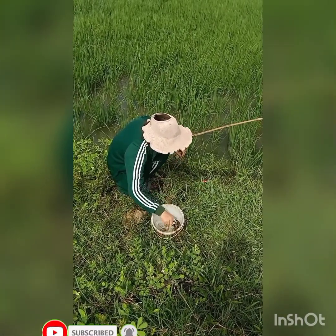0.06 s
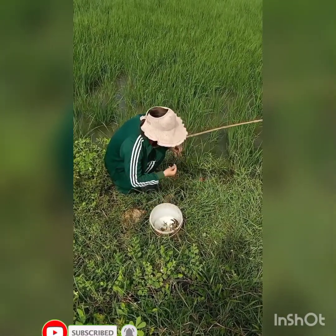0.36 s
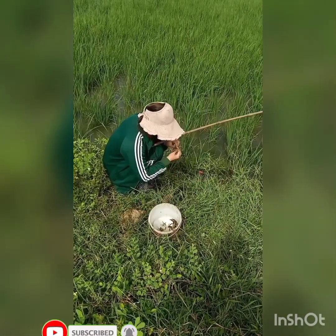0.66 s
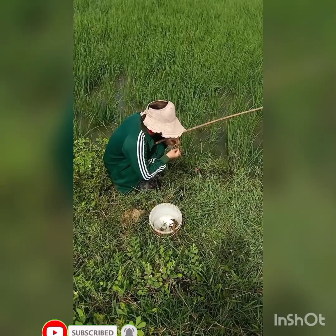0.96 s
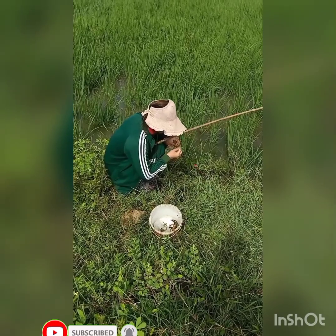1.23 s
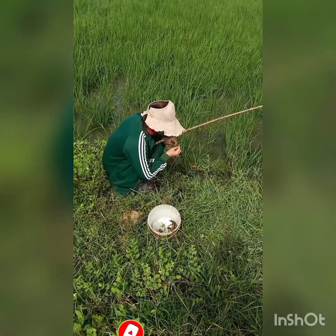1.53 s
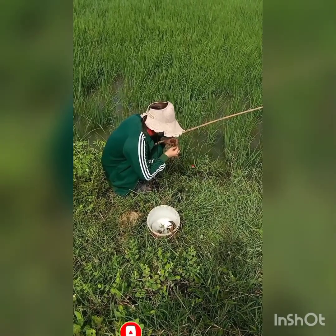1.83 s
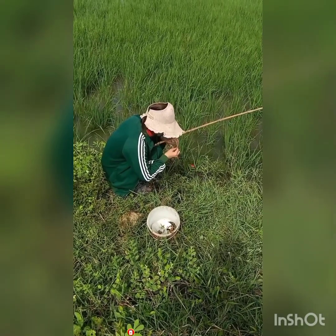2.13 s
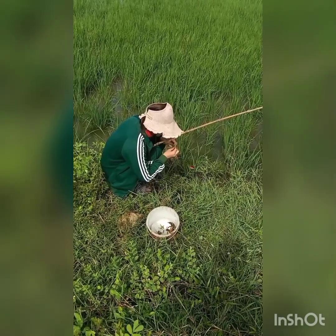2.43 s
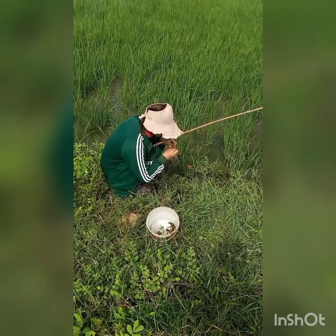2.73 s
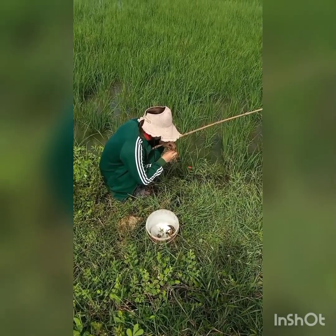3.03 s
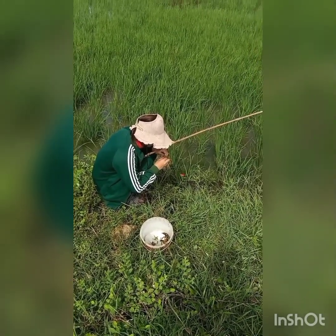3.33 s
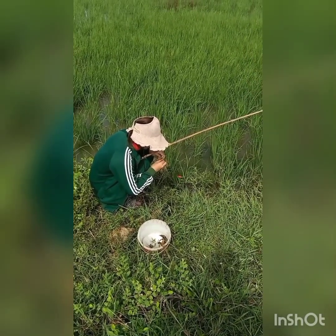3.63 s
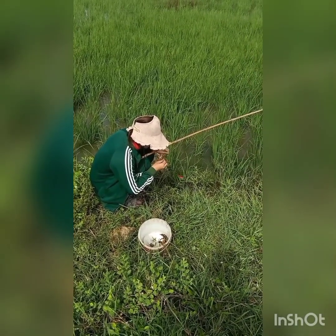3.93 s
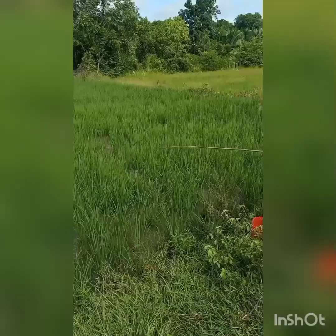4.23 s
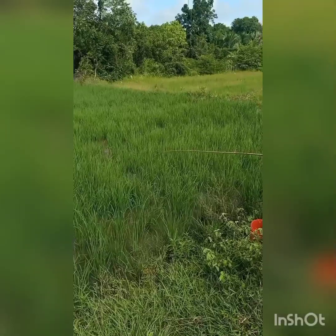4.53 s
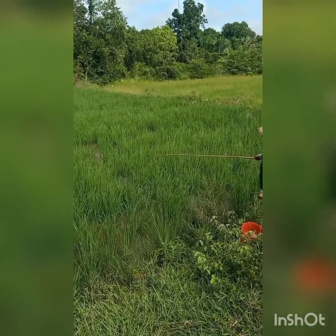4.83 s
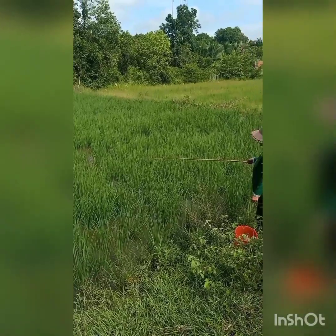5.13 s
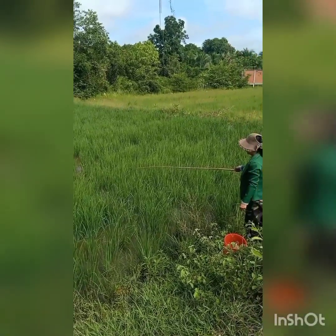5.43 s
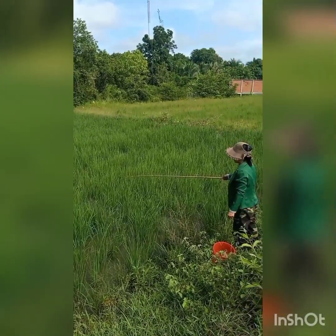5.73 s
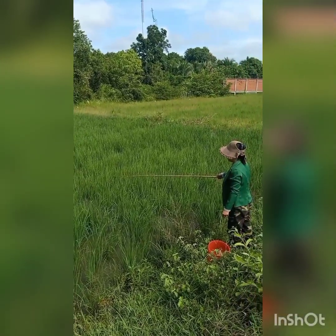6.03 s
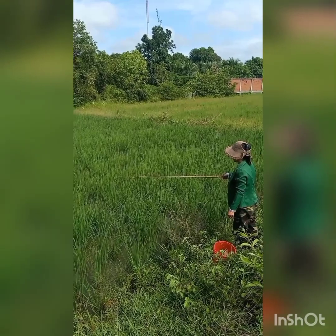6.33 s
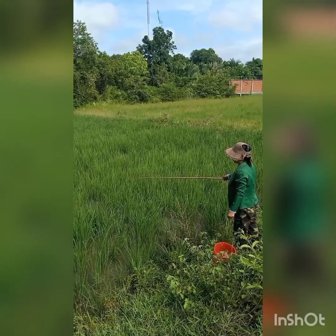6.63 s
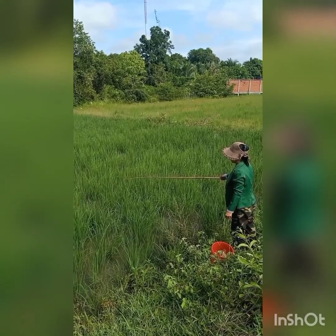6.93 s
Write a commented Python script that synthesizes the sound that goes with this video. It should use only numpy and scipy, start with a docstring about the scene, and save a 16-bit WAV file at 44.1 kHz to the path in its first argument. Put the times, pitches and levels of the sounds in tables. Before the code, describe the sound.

Hollow hoots, clucks and quick trills from a close bird outdoors, with a sudden knocking swish, distant thin whistles and faint insects.

```python
"""A marsh bird calls over a rice field: clucks, quickening trills and hollow, arched hoots that break
to a lower register. Its swollen throat favours the fundamental, so the tone is nearly pure, with hoarse
air around it. A loud swish of noise swells into close knocks and a thump, then dies away. Small birds
whistle high and far off, over a quiet bed of air, low hum, insects, snapping stalks, soft rustles
and a faint far tone fading at the start."""
import sys
import numpy as np
from scipy import signal
from scipy.fft import rfft, irfft, next_fast_len
from scipy.io import wavfile
from scipy.ndimage import map_coordinates

SR = 44100
rng = np.random.default_rng(int(sys.argv[2]) if len(sys.argv) > 2 else 0)


def int16_out(signal):
    """Quantize to a 16-bit WAV file."""
    q = np.round(np.clip(np.atleast_2d(signal).T, -1, 1) * 32767)
    wavfile.write(sys.argv[1], SR, q.astype(np.int16))


N = 315756
T = np.arange(N) / SR


def amp(db):
    """Decibels to gain."""
    return 10 ** (np.asarray(db) / 20)


def unit(x):
    """Scale to rms 1."""
    return x / np.sqrt(np.mean(x ** 2) + 1e-20)


def along(points, hz):
    """Read a curve of (Hz, value) points on a log frequency axis."""
    freqs, values = np.transpose(points)
    return np.interp(np.log(hz + 1), np.log(freqs), values)


def wobble(rate):
    """Smooth random modulation, rate knots a second."""
    return map_coordinates(rng.standard_normal(int(N * rate / SR) + 4), [T * rate])


def filtered(x, gain):
    """EQ x with a gain that depends on frequency."""
    size = next_fast_len(N + SR // 2)
    return irfft(rfft(x, size) * gain(np.fft.rfftfreq(size, 1 / SR)), size)[:N]


def noise(spectrum):
    """Noise of rms 1 with the given (Hz, dB) colour."""
    return unit(filtered(rng.standard_normal(N), lambda hz: amp(along(spectrum, hz))))


def band(centre_hz, octaves):
    """Noise of rms 1 in one bell-shaped band."""
    bell = lambda hz: np.exp(-.5 * (np.log2((hz + 1) / centre_hz) / octaves) ** 2)
    return unit(filtered(rng.standard_normal(N), bell))


def sine(pitch):
    """A sine oscillator following a pitch curve in Hz."""
    return np.sin(2 * np.pi * np.cumsum(pitch) / SR)


def ramp(length):
    """From 0 to 1 in length seconds."""
    return np.linspace(0, 1, int(length * SR))


def decay(t, t60):
    """An envelope that loses 60 dB every t60 seconds."""
    return np.exp(-np.log(1000) * t / t60)


def gate(t, length, attack, release):
    """Opens smoothly at t = 0 and has closed by t = length."""
    return np.sin(np.pi / 2 * np.clip(np.minimum(t / attack, (length - t) / release), 0, 1)) ** 2


def surge(s, rise, hold, t60, bend=2):
    """Swells up to time s, holds and dies away; a lower bend makes the swell more pointed."""
    return np.exp(-(np.maximum(s - T, 0) / rise) ** bend) * decay(np.maximum(T - s - hold, 0), t60)


def add(track, s, sound):
    """Mix a sound into the track at time s."""
    part = track[max(round(s * SR), 0):][:len(sound)]
    part += sound[:len(part)]


# Colour of the still air: (frequency [Hz], relative level [dB])
AIR_COLOUR = [(25, -26.5), (42, -12.5), (60, 1), (110, 7), (150, -3.5), (260, -7.5), (450, -11), (900, -11),
              (1500, -20.5), (2400, -14.5), (3300, -28), (6800, -31), (8500, -38), (15000, -39.5)]
# Hum tones: (pitch [Hz], level [dB])
HUM_TONES = [(66.5, -77.5), (98, -76.5)]
# Far insect chorus: (centre [Hz], width [octaves], level [dB])
INSECT_BANDS = [(2178, .06, -82), (5000, .05, -94), (6437, .06, -95.5)]
def ambient_bed(air_db=-72.5, drift_rad=.14, throb_hz=10.4, throb_db=3.5, shimmer_db=1):
    """Still air, two low hum tones that throb in turn, and a shimmer of far insects."""
    throb = throb_db * np.sin(2 * np.pi * throb_hz * T)
    hum = np.zeros(N)
    for k, (hz, db) in enumerate(HUM_TONES):
        tone = np.sqrt(2) * np.sin(2 * np.pi * hz * T + drift_rad * wobble(32))
        hum += amp(db + (-1) ** k * throb) * tone
    insects = sum(amp(db + shimmer_db * wobble(25)) * band(hz, octaves)
                  for hz, octaves, db in INSECT_BANDS)
    return hum + insects + amp(air_db) * noise(AIR_COLOUR)


def cricket(tick_hz=5100, period_s=.192, spacing_s=.036, tick_s=.0044, level_db=-81):
    """A far insect ticks in threes, each tick falling a little in pitch."""
    out = np.zeros(N)
    progress = ramp(tick_s)
    for group in np.arange(.09, N / SR, period_s):
        for k, (accent, detune) in enumerate(rng.standard_normal((3, 2))):
            pitch = tick_hz * (1 + .015 * detune - .06 * (progress - .5))
            envelope = amp(level_db + 2 * accent) * np.sin(np.pi * progress)
            add(out, group + k * spacing_s, envelope * sine(pitch))
    return out


# A faint far tone (first row), then soft rustles:
# (peak time [s], rise [s], t60 [s], centre [Hz], width [octaves], level [dB])
TONE_AND_RUSTLE_CUES = [(0, .02, 0.69, 1056, 0.04, -70), (.219, 0.17, 2.5, 497, 0.2, -74),
                        (.2, .35, 3.1, 2300, .25, -82), (3.75, 0.089, 3.45, 257, 0.11, -76.5),
                        (5.09, .046, 0.83, 588.4, .22, -73.5), (5.38, 0.034, 0.69, 327.3, 0.49, -69),
                        (5.61, .021, 0.7, 600, .7, -69.5), (5.61, 0.015, 0.46, 5390, 0.12, -75),
                        (5.892, 0.0098, 0.58, 213.3, 0.8, -57.5), (6.08, 0.19, 3.6, 2104, 0.36, -71),
                        (6.302, 0.38, 2.8, 311, 0.16, -69.5)]
def far_tone_and_rustles():
    """A faint far tone, a very narrow noise band, fades at the start; wider bands swell as soft rustles."""
    return sum(amp(db) * surge(s, rise, 0, t60) * band(hz, octaves)
               for s, rise, t60, hz, octaves, db in TONE_AND_RUSTLE_CUES)


# Stalk snaps: (time [s], level [dB])
SNAP_CUES = [(4.3949, -62), (4.544, -72), (4.5742, -68), (4.657, -68.5), (5.605, -66), (5.8851, -65)]
def stalk_snaps(t60=.014):
    """Dry stalks snap in tiny bursts of bright noise."""
    envelope = np.zeros(N)
    t = np.arange(SR // 20) / SR
    for s, db in SNAP_CUES:
        add(envelope, s, amp(db) * decay(t, t60))
    return envelope * band(2200, .8)


# Reverb decay of the field: (frequency [Hz], t60 [s])
FIELD_DECAY = [(300, 0.62), (750, .4), (2000, .22), (6000, .24), (10000, 0.05)]
def field_reverb(x, build_s=.022):
    """The field and its tree line scatter sound back as a diffuse tail, longest in the lows."""
    hz, t, spectra = signal.stft(rng.standard_normal(SR // 2), SR, nperseg=256)
    tail = signal.istft(spectra * decay(t, along(FIELD_DECAY, hz)[:, None]), SR, nperseg=256)[1]
    tail *= 1 - np.exp(-np.arange(len(tail)) / SR / build_s)
    return signal.fftconvolve(x, tail / np.linalg.norm(tail))[:N]


# Arched chirps: (time [s], level [dB])
CHIRP_CUES = [(.925, -68), (4.676, -69)]
# Sputters: (time [s], sweeps [count, rounded in use], spacing [s], top pitch [Hz], mid level [dB],
# afternote level [dB], top edge level [dB])
SPUTTER_CUES = [(1.952, 1.7, 0.009, 7670, -55, -77, -80.5), (3.1, 3.5, 0.011, 6930, -51.5, -61.5, -80),
                (5.002, 3.6, .0095, 6660, -53.5, -65, -100)]
# Flat peeps: (time [s], length [s], pitch [Hz], level [dB])
PEEP_CUES = [(1.323, 0.017, 5375, -56.5), (1.43, .038, 5620, -68.5), (1.801, 0.036, 5330, -66.5),
             (3.056, .045, 5540, -64.5), (5.113, 0.015, 6440, -63), (6.582, .027, 5370, -63),
             (6.796, 0.017, 5580, -69), (6.902, 0.026, 5230, -70.5)]
def small_birds(sweep_from_hz=4980, scatter_hz=180, grow_db=4.5, sizzle_db=-4.5):
    """Thin whistles: arched chirps, sizzling sputters of rising sweeps, and flat peeps."""
    out, drift = np.zeros(N), wobble(500)
    sizzle, top_edge = band(5630, .11), band(8800, .07)

    def whistle(s, pitch, db, waver=.022):
        """One softly rounded note wavering along a pitch curve."""
        pitch = pitch * (1 + waver * drift[round(s * SR):][:len(pitch)])
        envelope = np.sin(np.linspace(0, np.pi, len(pitch)))
        add(out, s, np.sqrt(2) * amp(db) * envelope * sine(pitch))

    for s, db in CHIRP_CUES:
        from_crest = (ramp(.05) - .33) / .67
        whistle(s, 7250 - 1600 * from_crest ** 2, db)
    for s, sweeps, spacing, top_hz, db, after_db, edge_db in SPUTTER_CUES:
        sweep = sweep_from_hz + (top_hz - sweep_from_hz) * ramp(.014)
        for k in range(round(sweeps)):
            pitch = sweep + scatter_hz * rng.standard_normal()
            whistle(s + k * spacing, pitch, db + grow_db * (k - sweeps / 2))
        whistle(s + .069, 6400 - 1150 * ramp(.032), after_db)  # falling afternote
        burst = surge(s + (sweeps - 1) * spacing, rise=.016, hold=0, t60=.08)  # near the last sweep
        out += burst * (amp(db + sizzle_db) * sizzle + amp(edge_db) * top_edge)
    for s, length, hz, db in PEEP_CUES:
        whistle(s, np.full(int(length * SR), hz), db, waver=.006)
    return out


# Hollow body of the swish: (frequency [Hz], relative level [dB])
BODY_COLOUR = [(25, -17), (90, -27), (180, -27.5), (245, -12), (320, -1.5), (420, -7), (530, 1),
               (650, -5.5), (820, -14), (1000, -29), (2000, -80.5)]
# Hiss on top of it: (frequency [Hz], relative level [dB])
HISS_COLOUR = [(450, -30.5), (660, 8.5), (810, 11), (930, -1), (1300, -1), (2000, -8.5), (3000, -12.5),
               (5500, -16), (7000, -20.5), (8800, -24.5), (9600, -50.5), (15000, -66.5)]
def swish(start_s=1.4897, peak_s=1.56, end_s=1.876, swell_db=29, release_s=.018):
    """A hollow rush layered with hiss and rumble swells quickly, fades slowly and stops."""
    before_peak = np.clip((peak_s - T) / (peak_s - start_s), 0, 1) ** 1.6
    fade = np.clip((T - peak_s) / (end_s - peak_s), 0, 1) ** .65  # steep at first, then slower
    window = gate(T - start_s, end_s + release_s - start_s, attack=.0017, release=release_s)
    body = amp(-12.5 - 36.5 * fade) * noise(BODY_COLOUR)
    hiss = amp(-21.5 - 42.5 * fade) * noise(HISS_COLOUR)
    rumble = amp(-42 - 18 * fade) * band(24, .59)
    return window * amp(-swell_db * before_peak) * (body + hiss + rumble)


# Knocks at the crest of the swish: (time [s], pitch [Hz], gain [dB], t60 [s])
KNOCK_CUES = [(1.5438, 640, -2.5, .04), (1.5543, 530, 0, .035), (1.5604, 560, -4, .014)]
def knocks(thump_s=1.5615, thump_width_s=.0052, thump_gain_db=-8, attack_s=.00064):
    """Dull, quickly damped blows ride on a thump: one low push and pull of air."""
    offset = (T - thump_s) / thump_width_s
    out = -amp(thump_gain_db) * offset * np.exp(-.5 * offset ** 2)
    t = np.arange(SR // 8) / SR
    for s, hz, db, t60 in KNOCK_CUES:
        envelope = decay(t, t60) * (1 - np.exp(-t / attack_s))
        add(out, s, amp(db) * envelope * np.sin(2 * np.pi * hz * t))
    return out


# Resonance of the marsh bird's throat: (frequency [Hz], relative level [dB])
THROAT_COLOUR = [(250, -50), (450, -23.5), (590, 3), (780, 2.5), (900, -5), (1050, -12.5), (1450, -28),
                 (2000, -41.5), (4000, -53), (5400, -48), (7000, -58.5), (9000, -69.5)]
# Hoarse air around the notes: (peak time [s], rise [s], hold [s], t60 [s], level before trim [dB])
RASP_CUES = [(0.851, .007, 0.0039, 0.25, -38.5), (1.172, 0.024, 0.027, 0.06, -38.5),
             (2.329, .005, 0.0049, .07, -39), (6.12, .009, 0.0039, .3, -40),
             (6.441, 0.027, 0.0079, 0.049, -36), (6.817, 0.023, 0.29, 0.49, -44.5)]
def rasp(rough_db=3, trim_db=-1):
    """An irregular flutter of air rings in the marsh bird's throat."""
    envelope = sum(amp(db) * surge(s, rise, hold, t60, bend=1.1) for s, rise, hold, t60, db in RASP_CUES)
    breath = unit(noise(THROAT_COLOUR) * amp(rough_db * wobble(130)))
    return amp(trim_db) * envelope * breath


# Overtones the throat lets out: (frequency [Hz], level against the fundamental before trim [dB])
OVERTONE_COLOUR = [(900, -25.5), (1150, -20), (1430, -31.5), (1600, -37.5), (1800, -41), (2200, -40.5),
                   (3000, -50.5), (3600, -38.5), (4100, -51.5), (4900, -39.5), (5500, -37), (6200, -56),
                   (7500, -58), (9000, -72.5)]
# Hiss riding on the voice: (frequency [Hz], relative level [dB])
BREATH_COLOUR = [(350, -24.5), (600, 4.5), (900, 6.5), (1250, 0.5), (1700, 2.5), (2300, -8.5), (3100, -7),
                 (4000, -8.5), (5400, -3), (6500, -8), (7800, -15), (9000, -33)]
def voice(pitch, blur_rad, hiss_db, high_trim_db=-9):
    """A nearly pure tone: the swollen throat favours the fundamental over weak, airy overtones."""
    n = len(pitch)
    phase = 2 * np.pi * np.cumsum(pitch) / SR
    # uneven closing of the membranes smears the high overtones most
    jitter = blur_rad * signal.resample(rng.standard_normal(n // 100 + 2), n)
    tone = np.sin(phase)
    for k in range(2, 10):
        db = along(OVERTONE_COLOUR, k * pitch) + high_trim_db * (k > 2)
        tone += amp(db) * np.sin(k * phase + (k - 1) * jitter)
    colour = amp(along(BREATH_COLOUR, np.fft.rfftfreq(n, 1 / SR)))
    hiss = unit(irfft(rfft(rng.standard_normal(n)) * colour, n))
    return np.sqrt(2) * tone + amp(hiss_db) * hiss


def pip(length, hz, db, glide, release, droop_db):
    """One pulse of the voice: it opens fast, slides up in pitch and weakens before it closes."""
    t = np.arange(int((length + release / 2) * SR)) / SR
    from_middle = t / length - .5
    tone = voice(hz * (1 + glide * from_middle), blur_rad=.22, hiss_db=-45)
    return gate(t, t[-1], attack=.004, release=release) * amp(db - droop_db * from_middle) * tone


# Clucks: (time [s], length [s], pitch [Hz], level [dB])
CLUCK_CUES = [(.846, .012, 720, -35.5), (0.862, 0.015, 702, -29), (1.155, 0.02, 799, -38),
              (1.18, 0.017, 672, -29), (2.322, 0.018, 589, -38.5), (2.831, .007, 665, -44),
              (6.11, 0.013, 698, -36.5), (6.123, 0.018, 702.5, -30.5), (6.425, 0.018, 632, -35),
              (6.442, 0.0092, 697, -30.5), (6.784, 0.028, 752, -30), (6.826, 0.019, 804, -26.9),
              (6.874, 0.014, 813, -29.5)]
def clucks():
    """Short pulses of the voice, on their own or leading into a hoot or trill."""
    out = np.zeros(N)
    for s, length, hz, db in CLUCK_CUES:
        add(out, s, pip(length, hz, db, glide=.13, release=.006, droop_db=2))
    return out


# Trills: (first pulse [s], last pulse [s], pulses [count], quickening [ratio], first pitch [Hz],
# last pitch [Hz], level [dB])
TRILL_CUES = [(1.657, 1.885, 11, .2, 800, 722, -30.2), (6.923, 7.111, 9, .15, 780, 738, -31.2)]
def trills(pulse_s=.013, last_pulse_s=.025, scatter_db=.6, pitch_scatter=.017):
    """Pulses come ever faster and sink in pitch; the last is drawn out as it runs into a hoot."""
    out = np.zeros(N)
    for first, last, pulses, quicken, first_hz, last_hz, db in TRILL_CUES:
        for progress in np.linspace(0, 1, pulses):
            s = first + (last - first) * (progress + quicken * progress * (1 - progress))
            length = last_pulse_s if progress == 1 else pulse_s
            level = db - scatter_db * rng.standard_normal()
            hz = first_hz + (last_hz - first_hz) * progress
            hz *= 1 + pitch_scatter * rng.standard_normal()
            add(out, s, pip(length, hz, level, glide=.05, release=.007, droop_db=4.5))
    return out


# Hoots: (time [s], length before the break [s], crest delay [s], crest pitch [Hz], mid level [dB],
# fade [dB/s], tail length [s], tail end pitch [Hz], tail level [dB])
HOOT_CUES = [(1.195, .18, 0.06, 795.4, -29, -5, 0.024, 404, -47.5),
             (1.911, 0.12, .005, 714, -30, -5.5, 0.14, 495, -41.5),
             (2.341, 0.17, .04, 715.6, -32, 27, 0.087, 450, -45.5),
             (2.851, 0.14, 0.033, 723.3, -29.6, 11.5, 0.059, 372, -46),
             (6.453, 0.19, 0.062, 797.6, -30, -2, 0.025, 397, -43),
             (7.131, 0.12, 0.0078, 730.6, -33.5, 18, .02, 500, -46)]
def hoots(scoop_s=.0053, slump_s=.014, slump_db=-5.5, break_s=.006, low_hz=575, tail_fade_db=7):
    """Each hoot scoops up, arches, slumps as pressure runs out and breaks to a weak, falling tail."""
    out = np.zeros(N)
    waver, flutter_db = 1 + .0045 * wobble(220), .25 * wobble(45)
    for s, length, crest, hz, db, fade, tail, end_hz, tail_db in HOOT_CUES:
        on = (T >= s) & (T < s + length + tail)
        t = T[on] - s
        arch = 4.4 * (t - crest) ** 2
        scoop = np.exp(-t / scoop_s)
        slump = np.exp(np.minimum(t - length, 0) / slump_s)
        high_hz = hz * (1 - arch - .081 * scoop - .15 * slump)
        high_db = db - fade * (t - length / 2) + slump_db * slump
        fall = np.clip((t - length) / tail, 0, 1) ** 2.1
        low = np.clip((t - length) / break_s + .5, 0, 1)  # 0 in the high register, 1 in the low
        pitch = (1 - low) * high_hz + low * (low_hz + (end_hz - low_hz) * fall)
        level = (1 - low) * high_db + low * (tail_db - tail_fade_db * fall) + flutter_db[on]
        tone = voice(pitch * waver[on], blur_rad=.11, hiss_db=-45.5)
        out[on] += gate(t, length + tail, attack=.0045, release=.016) * amp(level) * tone
    return out


def scene(near_send_db=-35, far_send_db=-11):
    """The marsh bird sits close and dry; the small birds sit far back with more reverb."""
    near = hoots() + clucks() + trills() + rasp()
    far = small_birds()
    wet = field_reverb(amp(near_send_db) * near + amp(far_send_db) * far)
    impact = swish() + knocks()
    background = far_tone_and_rustles() + stalk_snaps() + cricket() + ambient_bed()
    return (near + far + wet + impact + background)[None]


def record(dry, cutoff_hz=15400):
    """A soft clip rounds the loudest peaks at full scale, then a brick-wall low-pass trims the top."""
    clipped = dry[0] / (1 + np.abs(dry[0]) ** 8) ** (1 / 8)
    return filtered(clipped, lambda hz: hz < cutoff_hz)[None]


dry = scene()
out = record(dry)
int16_out(out)
```